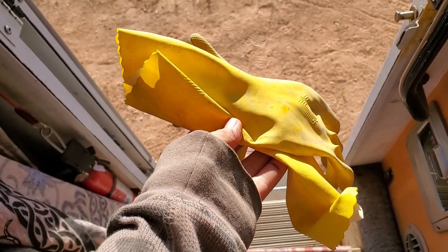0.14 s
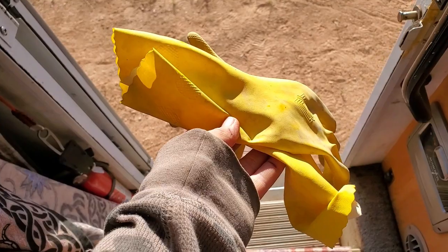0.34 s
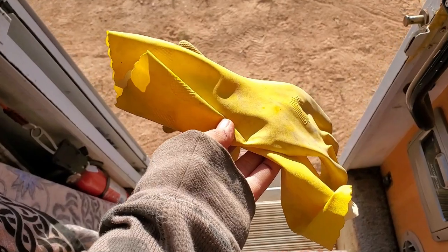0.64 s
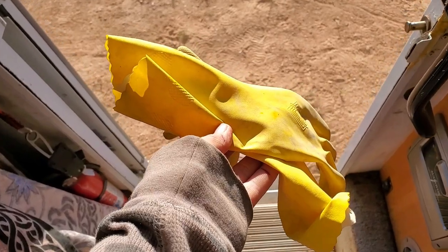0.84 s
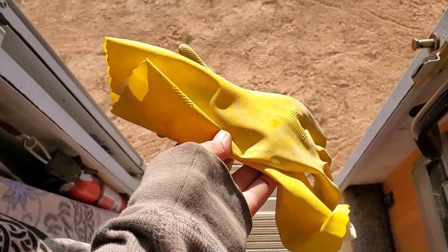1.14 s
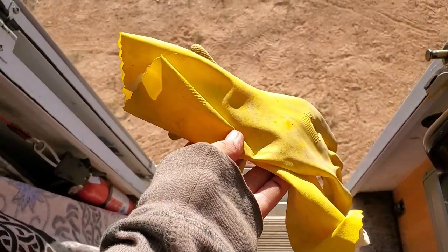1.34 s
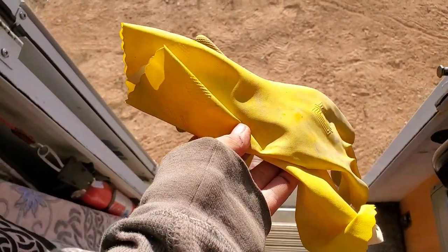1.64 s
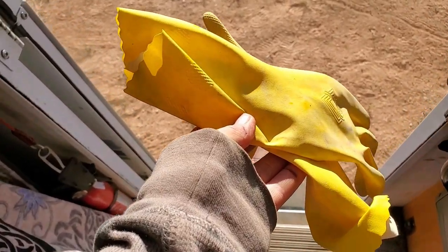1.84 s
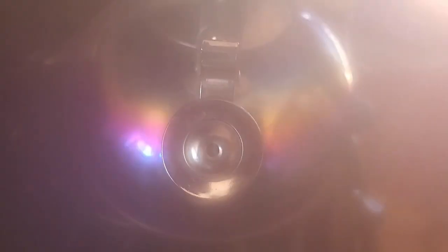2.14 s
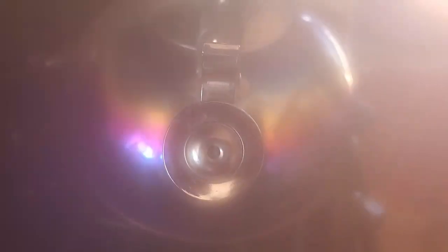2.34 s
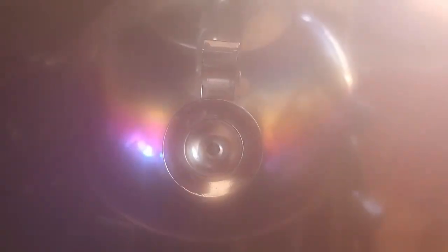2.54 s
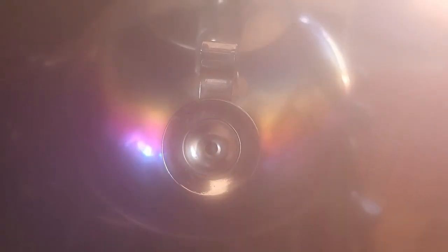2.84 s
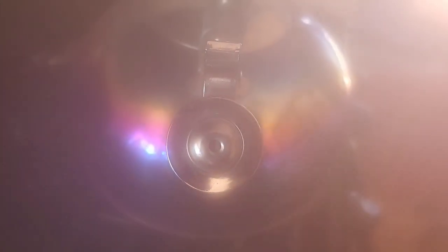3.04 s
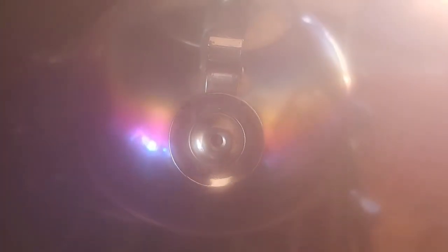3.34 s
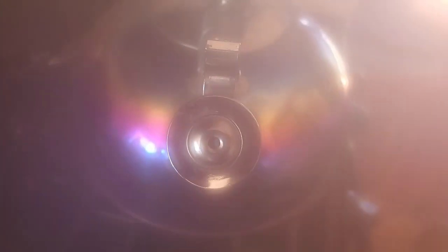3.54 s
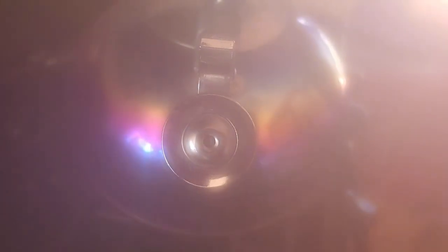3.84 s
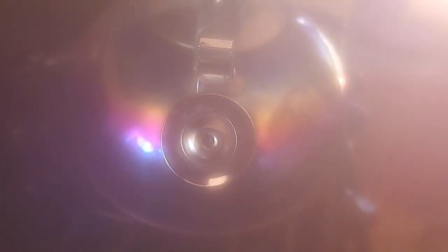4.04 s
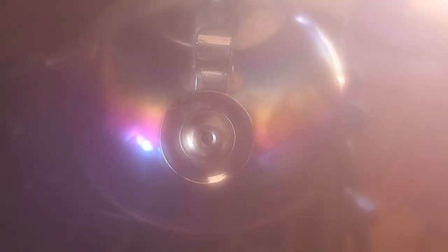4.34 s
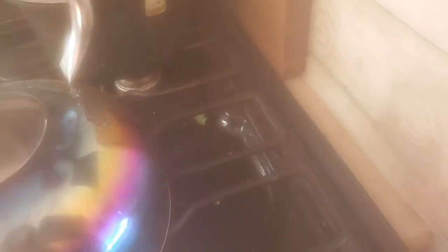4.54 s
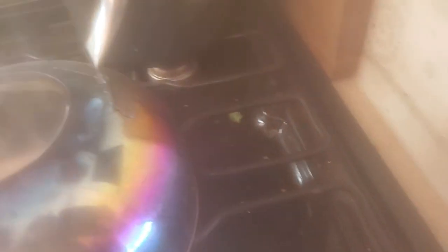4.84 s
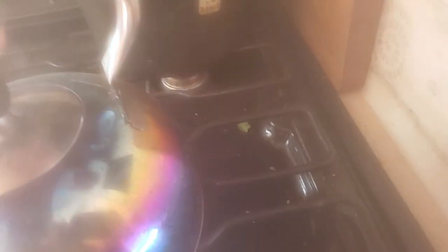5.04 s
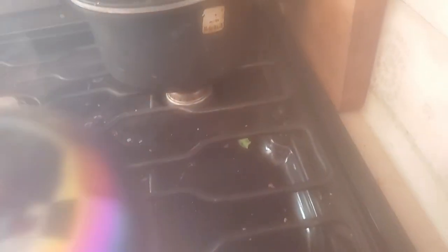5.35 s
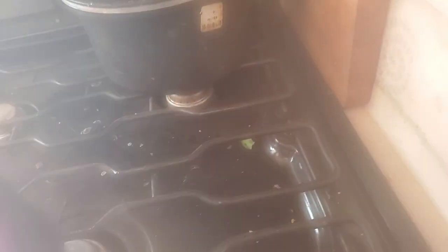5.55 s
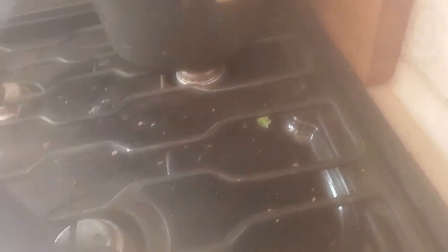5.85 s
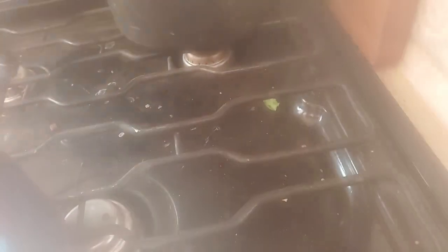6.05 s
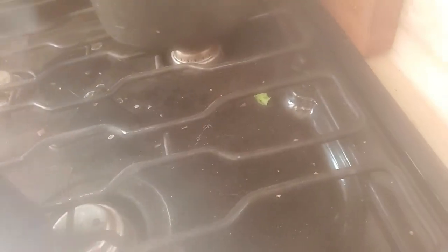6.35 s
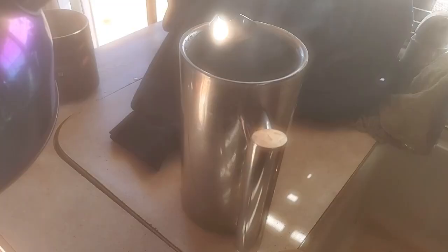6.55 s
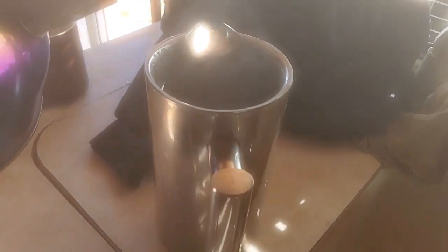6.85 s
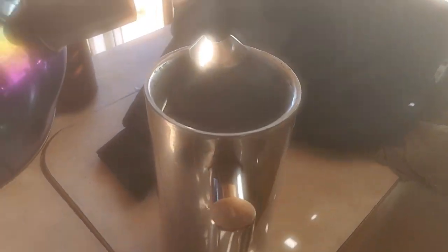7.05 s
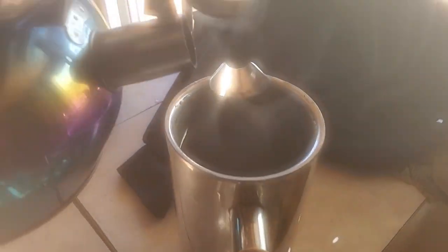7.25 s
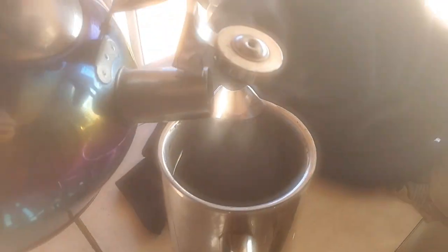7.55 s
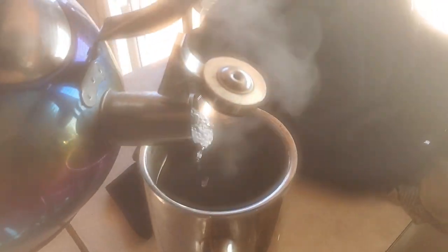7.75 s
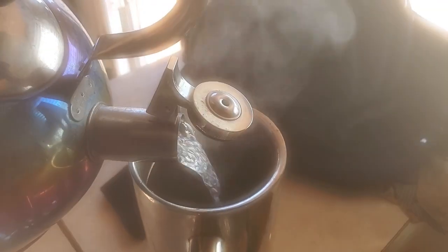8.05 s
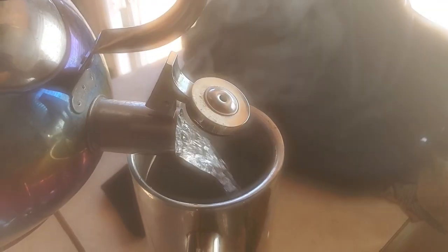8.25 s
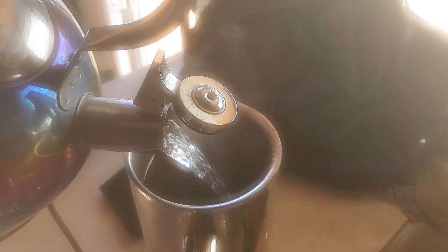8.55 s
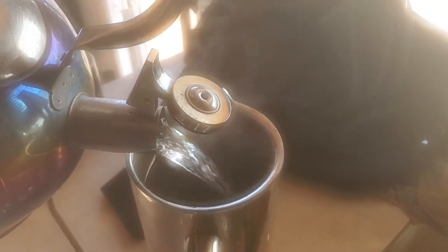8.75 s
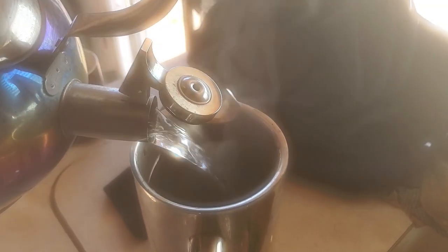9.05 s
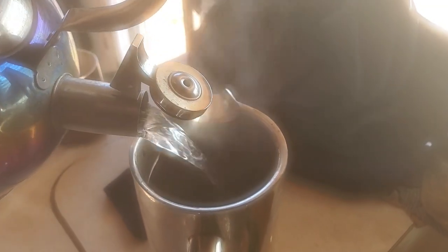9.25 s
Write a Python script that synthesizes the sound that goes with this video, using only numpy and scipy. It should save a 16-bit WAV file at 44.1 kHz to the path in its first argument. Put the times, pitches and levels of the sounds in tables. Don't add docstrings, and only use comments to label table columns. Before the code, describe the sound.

A stovetop kettle whistles shrilly and climbs in pitch, sags and swoops as it is lifted with metal knocks, then water splashes into a steel mug.

```python
import sys
import numpy as np
from scipy import signal
from scipy.fft import irfft, next_fast_len
from scipy.io import wavfile
from scipy.ndimage import uniform_filter1d

SR = 44100
rng = np.random.default_rng(int(sys.argv[2]) if len(sys.argv) > 2 else 0)


def inscribe(sig):
    pcm = np.round(np.clip(np.atleast_2d(sig).T, -1, 1) * 32767)
    wavfile.write(sys.argv[1], SR, pcm.astype(np.int16))


def undo_db(level):
    steps = np.asarray(level, float) / 20
    return 10 ** steps


N = 414981
T = np.arange(N) / SR
HZ = np.fft.rfftfreq(next_fast_len(N), 1 / SR)
PORT_LAG_S = .00018

STAGE_ENDS_S = [
    .53,
    4.48,
    5.43,
    6.31,
    7.9,
]
STAGE = np.searchsorted(STAGE_ENDS_S, T)
# (time [s], jet pitch [Hz], level of the first multiple [dB], of the second [dB])
SWOOP = [(5.408, 2135, -45, -63), (5.426, 2180, -36, -47), (5.441, 2356, -19, -36),
         (5.454, 2467, -13, -28.5), (5.475, 2784, -25.5, -20.5), (5.545, 3233, -16.5, -23),
         (5.59, 3055, -17, -27.5), (5.636, 2578, -19.5, -20), (5.683, 2516, -20.5, -29.5),
         (5.71, 2610, -23, -22), (5.8, 3114, -16, -22), (5.864, 3290, -20, -31), (5.91, 3067, -15.5, -28),
         (5.982, 2824, -27, -24), (6.076, 3240, -14.5, -24), (6.115, 2940, -22.5, -25.5),
         (6.155, 2547, -23, -26.5), (6.22, 2280, -23.5, -34.5), (6.298, 2040, -32.5, -35)]
SWOOP_EASE = .45
# (time [s], pitch [Hz])
MUG = [(7.4, 689), (8.4, 741), (9.41, 828)]


def walk(rate, size=N):
    hold = max(int(SR / rate), 1)
    steps = np.repeat(rng.standard_normal(size // hold + 1), hold)
    slewed = uniform_filter1d(uniform_filter1d(steps, hold), hold)[:size]
    return slewed / slewed.std()


def glide(t, s, values, ease=0.):
    rows = np.arange(len(s))
    place = np.interp(t, s, rows)
    part = place % 1
    swing = (1 - np.cos(np.pi * part)) / 2
    return np.interp(place + ease * (swing - part), rows, values)


def along(points):
    hz, value = np.transpose(points)
    return np.interp(np.log(HZ + 1), np.log(hz), value)


def noise(colour, lo_hz, hi_hz, balance_db, likeness, lag_s):
    shape = undo_db(along(colour)) * (HZ > colour[0][0]) * (HZ < colour[-1][0])
    in_band = shape[(HZ > lo_hz) & (HZ < hi_hz)]
    shape = shape / np.sqrt(2 * np.sum(in_band ** 2)) * N / np.sqrt(2)
    a, b = rng.standard_normal((2, len(HZ))) + 1j * rng.standard_normal((2, len(HZ)))
    c = np.clip(likeness, 0, 1)
    turn = 2 * np.pi * HZ * lag_s
    right = undo_db(-balance_db)
    left = 2 * shape / np.sqrt(1 + right ** 2 + 2 * c * right * np.cos(turn))
    far_port = c * a * np.exp(-1j * turn) + np.sqrt(1 - c ** 2) * b
    return irfft([left * a, left * right * far_port], next_fast_len(N))[:, :N]


def moved(bed_db, column, fall_db_s):
    # (time [s], slosh level [dB], rumble level [dB], held [s])
    moves = np.array([(.56, -56, -44.5, .42), (4.96, -67, -51, 0.068), (5.139, -51.5, -45, 0.018),
                      (5.198, -38.5, -34.5, 0.011), (5.589, -37, -36.5, 0.14), (6.199, -60.5, -68.5, 0.028),
                      (6.32, -86, -46.5, 0.0072), (6.45, -79, -52, 0.031), (6.89, -68, -62.5, 0.042),
                      (7.05, -72, -57.5, 0.19), (7.52, -55, -49, 0.12), (7.72, -55, -56, 0.053),
                      (8.015, -61.5, -48, 0.074), (8.32, -66, -51, .01), (8.405, -75, -50, 0.058),
                      (8.8, -70.5, -68, 0.041)])
    rise_s = 0.027
    t = T[::64]
    late = t[:, None] - moves[:, 0]
    rise_db = 40 * np.clip(-late / rise_s, 0, 5)
    fall_db = fall_db_s * np.clip(late - moves[:, 3], 0, 1)
    db = moves[:, column] - rise_db - fall_db
    power = undo_db(2 * bed_db[::64]) + undo_db(2 * db).sum(axis=1)
    return np.interp(T, t, 10 * np.log10(power))


def air_levels():
    # (hiss level [dB], slosh level [dB], rumble level [dB] at the start of the stage,
    # drift of hiss and slosh [dB/s], drift of rumble [dB/s])
    beds = [
        (-64, -72, -50, 0, -8),
        (-45, -61.5, -44.5, -.5, 2.5),
        (-66.5, -61, -77, -1, 12),
        (-35, -58, -64, -3.5, 1.5),
        (-55.5, -68.5, -81.5, 0.5, 11),
        (-64.5, -62.5, -59.5, -13, -8.5),
    ]
    # (time [s], flow against the bed [dB])
    flow = [(6.45, -19), (6.74, -4.5), (6.865, -17.5), (6.89, -9), (6.99, -13), (7.05, 3), (7.39, 1),
            (7.57, 9.5), (7.88, -3.5)]
    flow_slosh = 0.47
    jet_power, jet_hz = 3.5, 2964
    settled_s = 9.05
    hiss_db, slosh_db, rumble_db, drift, rumble_drift = np.transpose(beds)[:, STAGE]
    fade_clock = np.minimum(T, settled_s + 0.304 * (T - settled_s))
    since = fade_clock - np.array([0] + STAGE_ENDS_S)[STAGE]
    s, hz = np.transpose(SWOOP)[:2]
    jet_db = (STAGE == 3) * jet_power * 20 * np.log10(glide(T, s, hz, SWOOP_EASE) / jet_hz)
    flow_db = (STAGE == 4) * np.interp(T, *np.transpose(flow))
    return (uniform_filter1d(hiss_db + drift * since + jet_db + flow_db, size=900),
            moved(slosh_db + drift * since + flow_slosh * flow_db, column=1, fall_db_s=104.5),
            moved(rumble_db + rumble_drift * since, column=2, fall_db_s=141))


def hiss(level_db):
    quiet, jet, weak_jet = [(880, -65), (1500, -11), (2200, -20), (2820, -0.5), (3330, -16), (3600, -12.5),
                            (6510, -15), (15800, -27.5)], [(880, -54.5), (1500, -47), (2000, -16.5), (2760, -3.5),
                                           (3700, -9.5), (4040, -22.5), (4300, -7), (4550, 1), (6140, -0.5),
                                           (7180, -6), (7850, -20), (9010, -10.5), (10200, -20),
                                           (12600, -15.5), (15800, -27.5)], [(1500, -33), (2000, 1), (2660, 6), (3050, -20),
                                                        (3550, -11), (3900, -2.5), (5100, -2), (7550, -12),
                                                        (15800, -16.5)]
    tilted_jet, steam, spray = [(880, -61), (1500, -51.5), (2290, -14), (2630, -20), (3020, -12),
                                (3600, -14), (4050, -19), (4600, -10.5), (5900, -9), (7770, -22.5),
                                (9100, -16), (15800, -22.5)], [(1500, -12), (1640, -7.5), (1800, -21), (2300, -10),
                                                    (2500, -5), (2650, 1), (2820, -10), (3500, -10),
                                                    (4020, -17), (6300, -15.5), (7770, -24.5),
                                                    (10300, -17.5), (11300, -13), (15800, -10)], [(1500, -4.5), (1900, 4), (2300, 2.5),
                                                                   (2650, 0.5), (3200, -5.5), (4300, -3),
                                                                   (5200, -4), (6500, -6.5), (7700, -21),
                                                                   (8600, -12), (15800, -7.5)]
    gush, trickle, ebb = [(1500, -9.5), (2000, -9.5), (2300, -8), (2650, 0), (3100, -3), (3600, -5),
                          (3950, -15.5), (5500, -14.5), (7770, -22.5), (11600, -11.5), (15800, -12.5)], [(1500, -7), (2350, -0.5), (2550, 7), (2750, -5), (4200, -3.5),
                                        (5300, 5), (6200, -1), (7600, -9.5), (15800, -2)], [(1500, -5), (2300, -7), (2700, -4), (3600, -9),
                                                         (4100, -12), (5500, -9), (7770, -19),
                                                         (11600, -11.5), (15800, -13)]
    # (starts [s], ends [s])
    gush_s = (7.53, 7.69)
    # (frequency [Hz], left minus right [dB])
    ports = [(60, 18.5), (110, 18.0), (200, 19.0), (380, 14.5), (700, 2.5), (1290, 11), (2380, 17),
             (4400, 4), (8120, 2.5), (15000, -12)]
    trickle_s = 8.62
    colours = [quiet, jet, weak_jet, tilted_jet, steam, spray, gush, trickle, ebb]
    lean = [0.47, 1.0, 0.13, 0.48, 0.64, 0.72, 0.47, 0.47, 0.76]
    tone = np.where((STAGE == 4) & (T > gush_s[0]), 6, STAGE)
    tone = np.where((STAGE == 4) & (T > gush_s[1]), 8, tone)
    tone = np.where(T > trickle_s, 7, tone)
    out = 0
    for k, colour in enumerate(colours):
        layer = noise(colour, 8270, 14000, lean[k] * along(ports), 0.19, PORT_LAG_S)
        out = out + uniform_filter1d(1. * (tone == k), size=1500) * layer
    return out * undo_db(level_db + 1.0 * walk(25))


def rumble(level_db):
    # (frequency [Hz], density [dB/Hz])
    wind_colour, handling_colour = [(12, -39.5), (20, -12.5), (59, 1.5), (87, 2), (174, -9.5), (215, -12.5),
                                    (312, -22), (600, -34), (780, -59), (1320, -120)], [(12, -54.5), (20, -15), (27, -26), (54, 0.5),
                                                    (135, 2.5), (195, -1), (246, -14.5), (330, -14.5),
                                                    (430, -44.5), (730, -120)]
    # (time [s], left minus right [dB])
    wind_pan = [(0, 1), (.53, -2.5), (.56, 16.5), (2.3, 22.5), (4.2, 27.5), (4.45, 26.5)]
    pan_db = np.interp(T, *np.transpose(wind_pan))
    side = np.array([np.ones(N), undo_db(-pan_db)]) * 2 / np.sqrt(1 + undo_db(-2 * pan_db))
    wind = noise(wind_colour, 30, 250, 0, 0.51, PORT_LAG_S) * side * 0.77
    handling = noise(handling_colour, 30, 250, 1.3, 0.98, PORT_LAG_S)
    return np.where(STAGE < 2, wind, handling) * undo_db(level_db)


def slosh(level_db):
    # (frequency [Hz], density [dB/Hz])
    kettle_water, mug_water = [(250, 2.5), (330, 0), (700, -1.5), (1100, -1), (1700, -0.5), (2100, -15)], [(250, -5), (450, -7), (750, -4), (1100, 0.5), (1500, -4),
                                              (2100, -44)]
    # (time [s], ratio)
    hum_ratio = [(7.48, .7), (8.4, .9), (8.7, 2.3), (9.41, 2.4)]
    column_hz = np.interp(T, *np.transpose(MUG))
    hum = walk(230) * np.sin(2 * np.pi * np.cumsum(column_hz) / SR) * (T > 7.48)
    in_kettle = noise(kettle_water, 200, 2400, 2.48, 0.98, PORT_LAG_S)
    in_mug = noise(mug_water, 213, 2550, 9.8, 0.28, PORT_LAG_S)
    in_mug = in_mug + np.interp(T, *np.transpose(hum_ratio)) * hum
    return np.where(STAGE < 4, in_kettle, in_mug) * undo_db(level_db)


def air():
    hiss_db, slosh_db, rumble_db = air_levels()
    gust = 3.2 * np.tanh(walk(14))
    return hiss(hiss_db) + rumble(rumble_db + gust) + slosh(slosh_db + 0.44 * gust)


def whistle(table, turns, wobble, flutter_db, rasp, side_lines=(), beat=0., upper_db=0., even=0., ease=0., mix=()):
    # (time [s], left minus right below 4 kHz [dB], above 4 kHz [dB])
    whistle_pan = [
        [(0.56, 11, 10), (0.78, 11.0, 3.7), (2.76, 24, 13.8), (4.4, 7.3, 6.53)],
        [(4.54, 0.5, 14), (5.892, 10.5, 2.4), (6.3, 1.5, 3.2)],
    ]
    # (frequency [Hz], level [dB])
    upper = [(6000, -17), (6900, -23), (7900, -35.5), (8400, -31.5), (8800, -18.5), (9030, -14.5),
             (9130, -25.5), (9250, -18), (9800, -24.5), (10800, -53), (11900, -25), (13200, -51),
             (16000, -69.5)]
    # (time [s], pitch [Hz])
    spout_hz = [(4.5, 1270), (5.1, 1250), (5.25, 1300), (5.395, 1370), (5.42, 1650), (5.45, 1900)]
    warble_end_s, warble_beat_hz = .618, 66.3
    upper_pan_db, spout_rasp = -6, .35
    s, *columns = np.transpose(table)
    span = slice(int(s[0] * SR), int(s[-1] * SR))
    t = T[span]
    hz, first_db, second_db = (uniform_filter1d(glide(t, s, c, ease), size=600) for c in columns)
    at, pan_low, pan_high = np.transpose(sum(whistle_pan, []))
    drift = wobble * (walk(35, len(t)) / 2 + walk(110, len(t)) + walk(400, len(t)))
    beat_cycle = 2 * np.pi * warble_beat_hz * t + 0.5 * walk(60)[span]
    shake = beat * np.clip((warble_end_s - t) / .01, 0, 1) * np.cos(beat_cycle)
    phase = 2 * np.pi * np.cumsum(hz * (1 + drift + 0.051 * shake)) / SR
    calm = 2 * np.pi * np.cumsum(hz * (1 + drift)) / SR
    spout_now = np.interp(t, *np.transpose(spout_hz)) * (1 + 0.0024 * walk(55)[span])
    spout = 2 * np.pi * np.cumsum(spout_now) / SR

    def outside_db(start, end, ramp_s):
        return 60 * np.clip(np.maximum(start - t, t - end) / ramp_s, 0, 1)

    # (multiple, sign of the spout hum, level dB, turn between ports rad, roughness)
    lines = [(1, 0, first_db, turns[0], rasp), (2, 0, second_db, turns[1], 1.61 * rasp)]
    for k in range(3, 6):
        landing_db = (1 - even) * np.interp(k * hz, *np.transpose(upper))
        lines.append((k, 0, first_db + upper_db - 7 * k * even + landing_db, turns[2], 3 * rasp))
    for k, db, start, end, rough in side_lines:
        lines.append((k, 0, first_db + db - outside_db(start, end, 0.017), turns[1], rough))
    for k, sign, db, start, end in mix:
        lines.append((k, sign, first_db + db - outside_db(start, end, .06), turns[1], spout_rasp))

    ends = np.clip(np.minimum(t - t[0] + 0.0032, t[-1] - t) / 0.005, 0, 1)
    out = np.zeros((2, N))
    for k, sign, level_db, turn, rough in lines:
        pan_db = upper_pan_db
        if k < 3:
            pan_db = np.where(k * hz < 4000, np.interp(t, at, pan_low), np.interp(t, at, pan_high))
        right = undo_db(-pan_db)
        throb = 1 + shake * {1: 0.3, 2: 1.6}.get(k, -0.5)
        size = undo_db(level_db + flutter_db * np.tanh(walk(44.98, len(t)))) * throb
        size = size * (1 + rough * walk(500, len(t))) * ends * (k * hz < 16000)
        left = 2 * np.sqrt(2) * size / np.sqrt(1 + right ** 2 + 2 * right * np.cos(turn))
        cycle = k * (phase if k == int(k) else calm) + sign * spout + 2.0
        out[:, span] += left * np.cos(cycle), left * right * np.cos(cycle - turn)
    return out


def boiling_whistle():
    # (time [s], jet pitch [Hz])
    boil = [(.552, 2517), (.63, 2574), (.85, 2617), (.888, 2696), (1.45, 2712), (1.68, 2714), (1.85, 2813),
            (2.05, 2758), (2.24, 2810), (2.31, 2901), (2.45, 2952), (2.78, 2974), (2.81, 2993), (3.6, 3026),
            (4.0, 3046), (4.1, 3076), (4.424, 3083)]
    # (time [s], kick [Hz], half width [s])
    surges = [(.59, -72, 0.024), (1.13, 30, 0.028), (1.419, -18.5, .04), (1.56, 25.5, 0.033),
              (1.75, 36, 0.017), (1.89, 45.5, 0.031), (1.94, -17, 0.0096), (1.98, 61, 0.026),
              (2.52, -59, .04), (3.233, -58.5, .03), (3.761, 43.5, 0.049), (4.16, 66, 0.042),
              (4.27, 39.5, 0.045), (4.35, -30, 0.022)]
    # (time [s], first multiple [dB], second multiple [dB])
    boil_db = [(.56, -21.5, -23.5), (.83, -21.5, -18), (.89, -17, -17.5), (1.17, -16.5, -19),
               (1.42, -19.5, -21), (1.63, -18, -20.5), (1.86, -17.5, -19), (2.19, -18.5, -20),
               (2.36, -17.5, -20), (2.96, -21, -19), (3.3, -22.5, -20.5), (3.5, -20.5, -18.5),
               (3.78, -22.5, -18.5), (3.99, -22.5, -17), (4.09, -27, -20.5), (4.15, -21, -19.5),
               (4.37, -26.5, -19)]
    # (multiple, level against the first [dB], starts [s], ends [s], roughness)
    warble = [(1.69, -5, .56, .61, .3), (2.36, -9, .56, .61, 0.3), (2.7, -7, .56, .61, 0.3),
              (1.5, -28, 2.36, 4.42, 1.6), (1.7, -20, .61, .625, 1.2), (.962, -21, 2.3, 4.42, 2),
              (2.7, -16, .61, .645, 1.2)]
    s = np.linspace(boil[0][0], boil[-1][0], num=500)
    hz = np.interp(s, *np.transpose(boil))
    for at, kick, half in surges:
        hz = hz + kick * np.exp(-((s - at) / half) ** 2)
    at, first_db, second_db = np.transpose(boil_db)
    table = np.transpose([s, hz, np.interp(s, at, first_db), np.interp(s, at, second_db)])
    return whistle(table, [4.4, .8, 4.5], .0025, flutter_db=1.5, rasp=0.067, side_lines=warble, beat=.38)


def sagging_whistle():
    # (time [s], jet pitch [Hz], first multiple [dB], second multiple [dB])
    sag, squeeze = [(4.533, 2816, -36.5, -50), (4.661, 2780, -43.5, -48), (4.84, 2628, -43, -60),
                    (4.9, 2580, -37, -55), (5.013, 2547, -38, -51.5), (5.19, 2460, -46, -57)], [(5.234, 2630, -33, -56), (5.3, 2680, -38, -58), (5.33, 2900, -39, -48),
                                 (5.354, 3034, -30, -46), (5.39, 3100, -29.5, -47),
                                 (5.414, 3420, -39.5, -35.5), (5.447, 3850, -27, -64)]
    # (multiple, level against the first [dB], starts [s], ends [s], roughness)
    half_lines = [(1.45, -13.5, 5.41, 6.5, 1.4)]
    # (multiple, sign of the hum, level against the first [dB], starts [s], ends [s])
    spout_mix = [(0, 1, -13, 4.5, 5.37), (1, -1, -14, 4.5, 4.88), (1, 1, -20, 4.5, 5.3),
                 (2, -1, -20, 4.5, 4.82), (1, -1, -20, 5.32, 5.44), (2, -1, -13, 5.345, 5.45)]
    return whistle(sag + squeeze, [1.2, .6, 1.1], .0035, flutter_db=5.5, rasp=0.23, side_lines=half_lines,
                   mix=spout_mix, upper_db=-19.0)


def ring(hz, t60, bend=0.):
    t = np.arange(int(SR * max(t60, .002))) / SR
    return np.sin(2 * np.pi * hz * t * (1 + bend * t / t60)) * np.exp(-np.log(1000) * t / t60)


def burst(lo_hz, hi_hz, t60, rise_s):
    t = np.arange(4096) / SR
    sos = signal.butter(2, [lo_hz, hi_hz], "bandpass", fs=SR, output="sos")
    band = signal.sosfilt(sos, rng.standard_normal(len(t)))
    fade = np.exp(-np.log(1000) * t / max(t60, .003))
    return band / band.std() / 2 * (1 - np.exp(-t / rise_s)) * fade


def add(out, s, sound, pan_db=0., lag=7):
    for ch in range(2):
        i = int(s * SR) + ch * lag
        part = sound[:N - i]
        out[ch, i:i + len(part)] += part * undo_db((2.0 - ch) * pan_db)


def kettle_knocks():
    # (time [s], peak [dB], thump [dB], tail [s], left minus right [dB])
    blows = [(4.958, -39, -34, 0.027, 3), (5.185, -34, -45, 0.03, 8.5), (5.193, -26, -41, 0.057, 8.5),
             (5.59, -19, -35.5, 0.12, 7), (5.61, -26, -36, 0.087, -11), (5.664, -14, -30, 0.074, 4),
             (5.739, -21, -31, 0.12, 0.5), (6.29, -54, -56, 0.09, 5.5), (6.384, -71, -49.5, 0.055, 4.5),
             (6.432, -58, -66, 0.08, 7), (6.476, -51, -47, 0.087, 4), (6.532, -48, -42, 0.14, 4.5),
             (6.618, -69, -63, 0.06, 2)]
    # (frequency [Hz], level [dB], t60 [s])
    walls = [(320.6, -10, 0.301), (448, -8, 0.29), (630, -4, 0.25), (847, -13, 0.253), (935, -9, 0.18),
             (1189, -1, 0.15), (1387, -1.5, 0.14), (1550, -7, .22), (1870, -8.5, .35), (2060, -1.5, 0.18),
             (3600, -7, 0.097)]
    out = np.zeros((2, N))
    for s, db, thump_db, tail, pan_db in blows:
        add(out, s, undo_db(db - 2.0) * burst(290, 3900, tail, 0.0029), pan_db)
        for hz, mode_db, t60 in walls:
            luck_db = 2.7 * rng.standard_normal()
            add(out, s + 0.0027, undo_db(db - 19.5 + mode_db + luck_db) * ring(hz, min(t60, .35)), pan_db)
        add(out, s, undo_db(db - 2) * burst(1600, 2700, 0.95 * tail, 0.0045), pan_db)
        add(out, s, undo_db(db - 13.0) * burst(2000, 14000, 0.74 * tail, .003), pan_db)
        add(out, s, undo_db(thump_db + 5.5) * burst(99, 220, 0.13, 0.0053), pan_db)
    return out


def swooping_whistle():
    return whistle(SWOOP, [1.4, 1.3, 1.2], .0045, flutter_db=5.5, rasp=0.23, upper_db=2.5, even=0.46,
                   ease=SWOOP_EASE)


def spout_cap():
    # (time [s], peak [dB], ring [Hz], tail [s])
    clicks = [
        (6.5193, -27.5, 3170, 0.026),
    ]
    # (frequency [Hz], level [dB], t60 [s])
    cap_modes = [(2270, -8, 0.041), (6130, -18, 0.081), (6770, -11, 0.044), (9300, 0, 0.044),
                 (10500, -6, 0.041)]
    out = np.zeros((2, N))
    add(out, 6.292, undo_db(-28) * burst(2350, 3030, 0.062, 0.0017), pan_db=6.5)
    add(out, 6.288, undo_db(-39.0) * burst(4400, 5500, 0.12, 0.0027), pan_db=0)
    add(out, 6.432, undo_db(-55.5) * burst(6000, 7700, 0.03, 0.001), pan_db=5.0)
    add(out, 6.435, undo_db(-58) * burst(1450, 1700, 0.24, 0.004), pan_db=2)
    for s, db, hz, tail in clicks:
        add(out, s, undo_db(db) * burst(0.975 * hz, 1.038 * hz, 2 * tail, 0.00055), pan_db=11.5)
        add(out, s - .006, undo_db(db - 4.0) * burst(630, 18000, 0.051, 0.0089), pan_db=11.5)
        for mode_hz, mode_db, t60 in cap_modes:
            mode = burst(.97 * mode_hz, 1.03 * mode_hz, t60, 0.00081)
            add(out, s, undo_db(db + mode_db) * mode, pan_db=7.5)
        add(out, s + 0.0083, undo_db(db - 2) * ring(173, 0.04), pan_db=0.0)
    return out


def pour():
    # (time [s], peak of the air column [dB], thump [dB], spatter [dB], bubble pitch [Hz])
    splashes = [(7.952, -46.5, -68, -41, 788), (7.988, -37, -65, -41, 1040), (8.007, -37, -37, -41, 900),
                (8.064, -36, -51, -43, 740), (8.086, -40, -51, -55, 600), (8.113, -49, -60, -42, 796),
                (8.132, -41, -61, -65, 820), (8.156, -36.5, -52, -36, 1036), (8.195, -51, -56, -60, 782),
                (8.215, -52, -60, -60, 800), (8.273, -44, -56, -37, 1110), (8.286, -44, -64, -42, 850),
                (8.317, -34, -40.5, -31.5, 780), (8.352, -43, -54, -41.5, 1060),
                (8.402, -37, -32.5, -39, 780), (8.445, -42, -42.5, -43.5, 794), (8.466, -51, -62, -44, 802),
                (8.498, -52, -62, -45.5, 817), (8.542, -40.5, -40.5, -52, 790),
                (8.559, -42.5, -59, -62, 800), (8.677, -57, -51, -64, 806), (8.716, -54, -52, -50, 806),
                (8.744, -58, -63.5, -64, 806), (8.773, -55.5, -62, -62, 806),
                (8.822, -53, -56.5, -61, 1100), (8.867, -57, -60, -65, 802), (8.936, -55, -63, -67, 802),
                (8.966, -62, -64, -66, 804), (8.999, -50, -63, -53, 1000), (9.127, -63, -69, -69, 881),
                (9.183, -65, -70.5, -70, 850)]
    out = np.zeros((2, N))
    chance = rng.random((len(splashes), 2, 2))
    for (s, db, thump_db, spatter_db, hz), bubbles in zip(splashes, chance):
        column_hz = 1.03 * np.interp(s, *np.transpose(MUG))
        add(out, s, undo_db(db - 7) * burst(600, 1350, .022, .001), pan_db=1.5)
        add(out, s, undo_db(db - 8) * ring(column_hz, .045, bend=-.1), pan_db=1.5)
        add(out, s, undo_db(db - 3) * ring(1.05 * hz, .028, bend=-.25), pan_db=1.5)
        add(out, s + 0.006, undo_db(thump_db + 5.5) * ring(184.2, 0.086), pan_db=-4.5)
        add(out, s + 0.01175, undo_db(thump_db - 5.5) * burst(412, 493, 0.075, 0.0072), pan_db=3.5)
        add(out, s, undo_db(spatter_db - 4) * burst(2150, 2800, .035, .001), pan_db=.8, lag=1)
        add(out, s, undo_db(spatter_db + 1) * burst(1700, 7500, .018, .0007), pan_db=.8, lag=1)
        add(out, s, undo_db(spatter_db + 1) * burst(10000, 15200, 0.024, 0.00068), pan_db=-5.5, lag=0)
        drops_s = s + .006 + .01 * bubbles[0, 0]
        add(out, drops_s, undo_db(spatter_db - 5) * burst(1900, 5500, .025, .001), pan_db=.8, lag=1)
        for late, size in bubbles:
            bubble = ring(hz * (0.7 + 0.6 * size), 0.022, bend=-.15)
            add(out, s + 0.03 * late, undo_db(db - 13) * bubble, pan_db=1.5)
    return out


def scene():
    on_flame = air() + boiling_whistle()
    carried = sagging_whistle() + kettle_knocks() + swooping_whistle()
    return on_flame + carried + spout_cap() + pour()


def roll_off(x):
    return signal.sosfilt(signal.butter(12, 16850, fs=SR, output="sos"), x)


def record(dry):
    # (starts [s], ends [s])
    splices = [
        (.521, .551),
        (4.4205, 4.533),
        (6.504, 6.511),
    ]
    ceiling, top_hz = 1.2, 15700
    gate = np.prod([(T < a) | (T > b) for a, b in splices], axis=0)
    rounded = ceiling * np.tanh(dry / ceiling)
    top = signal.ellip(10, .2, 70, top_hz, fs=SR, output="sos")
    mix = signal.sosfilt(top, rounded * uniform_filter1d(1. * gate, size=60))
    return roll_off(mix)


dry = scene()
out = record(dry)
inscribe(out)
```